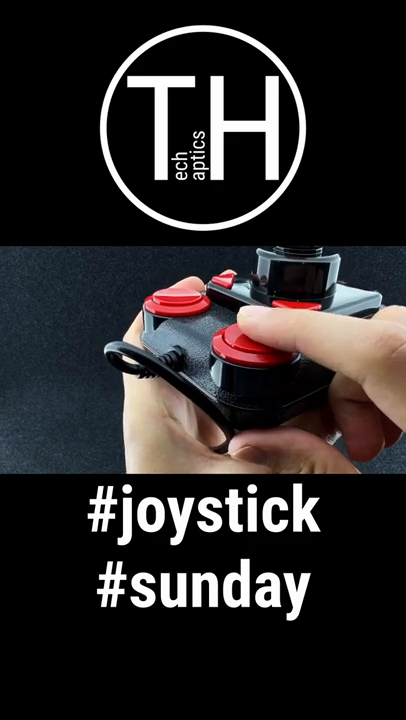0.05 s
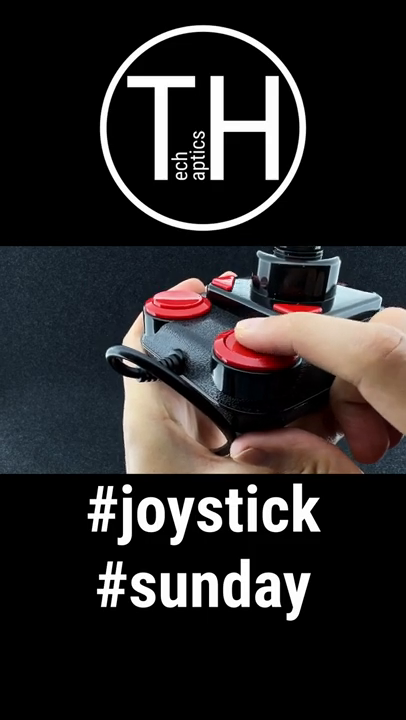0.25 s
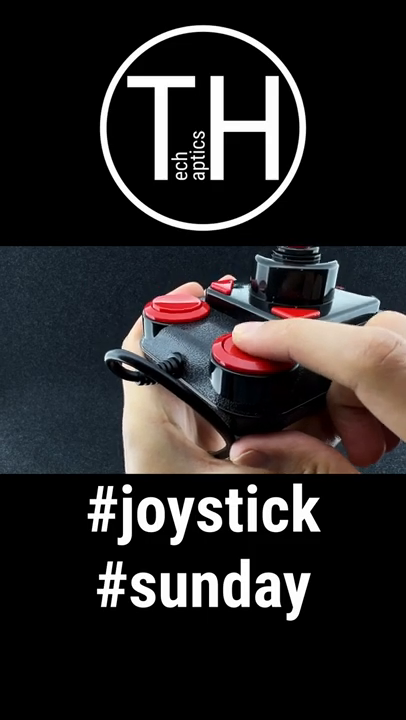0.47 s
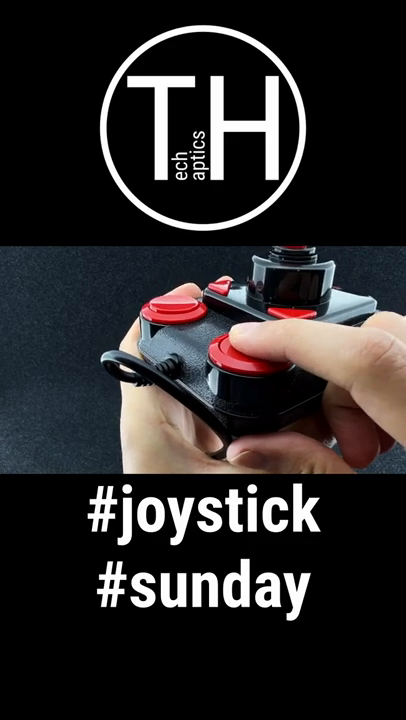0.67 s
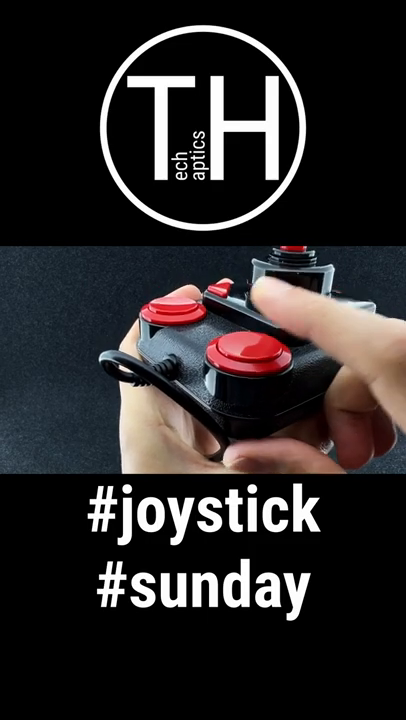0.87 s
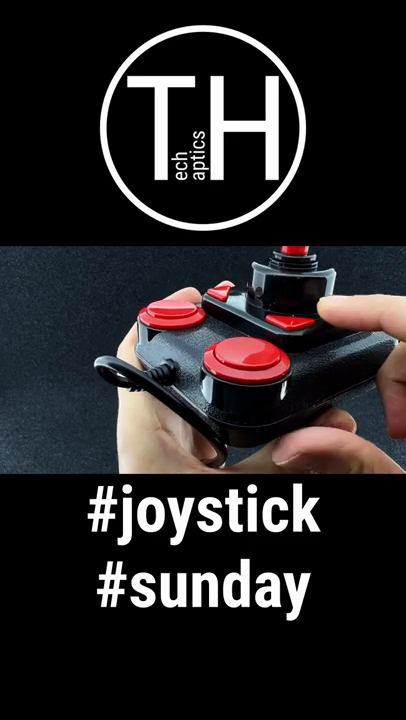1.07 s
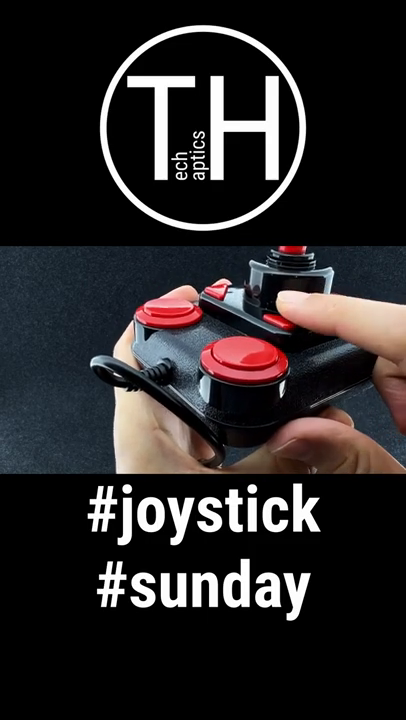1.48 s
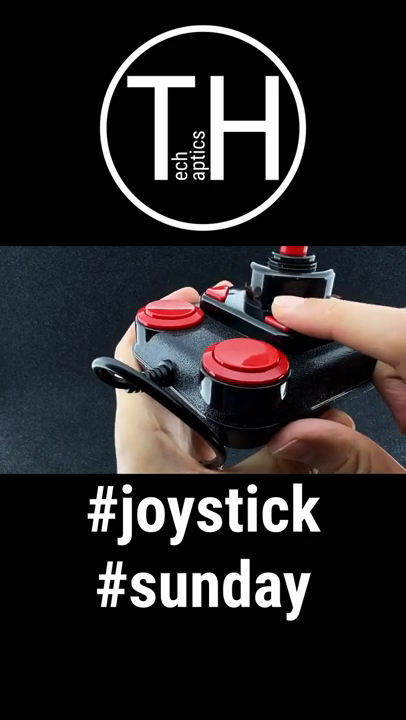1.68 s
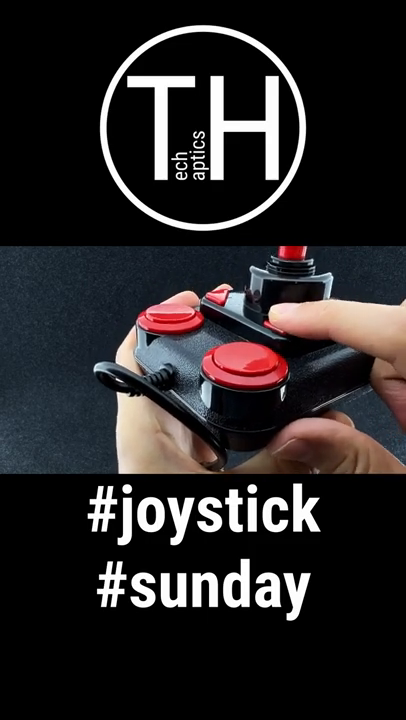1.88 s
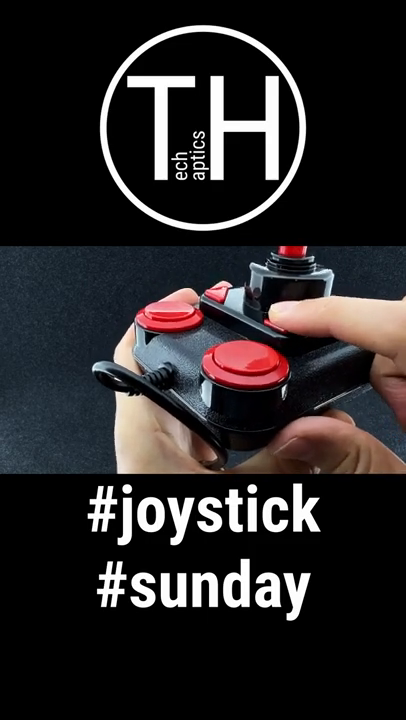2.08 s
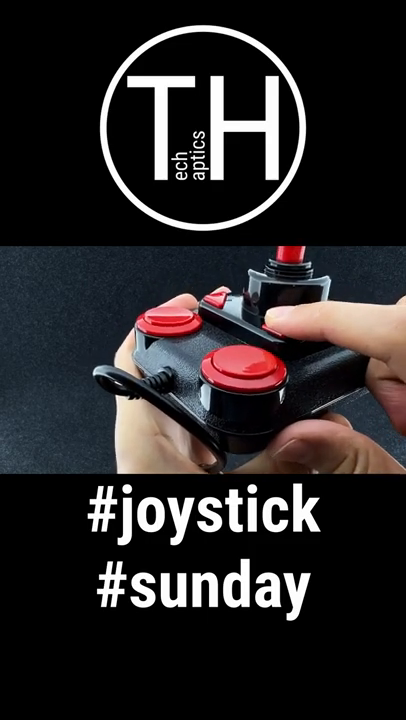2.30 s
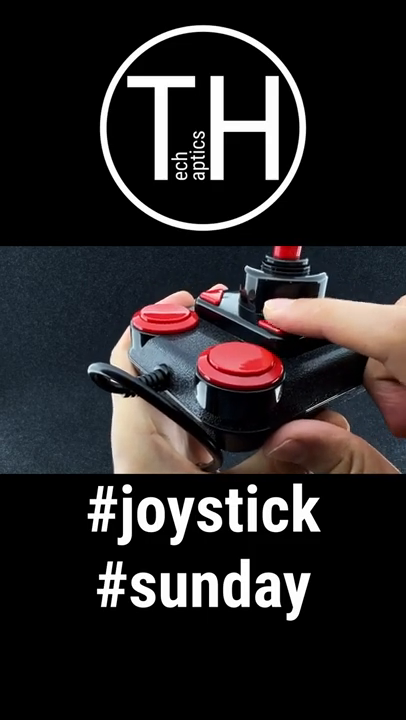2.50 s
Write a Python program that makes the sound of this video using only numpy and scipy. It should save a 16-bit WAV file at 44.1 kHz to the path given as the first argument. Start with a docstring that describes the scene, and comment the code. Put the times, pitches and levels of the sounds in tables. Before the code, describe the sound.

Joystick buttons click sharply under a thumb, in two quick groups with light handling ticks.

```python
"""A quiet room, a plastic joystick held close to a stereo microphone, slightly to the right.
A thumb works the round fire button three times, then a small button twice. Each press and release
snaps a switch: a crack, short modes of the hollow case, and a faint ring of springs and room.
Fingers tick and knock on the case; under them the holding hand rumbles and the room hisses."""
import sys
import numpy as np
from scipy import signal
from scipy.fft import rfft, irfft
from scipy.io import wavfile

SR = 44100
rng = np.random.default_rng(int(sys.argv[2]) if len(sys.argv) > 2 else 0)


def put_to_file(sound):
    """Save the sound as 16-bit audio at rate SR, in the file named by the first command-line argument."""
    columns = np.atleast_2d(sound).T  # one column per channel
    safe = np.clip(columns, -1, 1)
    whole_steps = np.round(safe * 32767)
    wavfile.write(sys.argv[1], SR, whole_steps.astype(np.int16))


N = 116865
T = np.arange(N) / SR

# Switch snaps: start_s, level_db, treble_db, bounce_delay_s, bounce_db (0 is twice the first strike)
ROUND_PRESSES = [(.2491, 2, -1.5, 0.00027, 17.5), (.4352, 0, -3.5, 0.0001, -13),
                 (.6272, -1.5, 2, .0003, -0.5)]
ROUND_RELEASES = [(.3812, 0, 0, .0006, -1), (.5523, 0, 0, 0.0005, -3), (.7793, 0, 0.0045, 0.00029, -5)]
SMALL_PRESSES = [(1.8703, 0.0046, 0.0022, .0004, -2.5), (2.0724, 0, 0, .0004, -28)]
SMALL_RELEASES = [(2.0210, -0.53, -0.87, .0004, 10), (2.3879, 0.49, -0.26, .0004, -14)]
# Case modes rung by each kind of snap, before the grip damps them: pitch_hz, level_db, t60_s
ROUND_PRESS_MODES = [(381, -33.5, 0.049), (593, -31.5, 0.017), (860, -26, 0.013), (1225, -20.5, .017),
                     (1613, -20, 0.022), (1982, -18.5, .016), (2188, -18, 0.0146), (3043, -30.5, .022),
                     (3740, -29, 0.034), (4600, -26, 0.025), (5273, -22, 0.012), (6640, -29, 0.018),
                     (8577, -33, .014), (11704, -22.5, .007)]
ROUND_RELEASE_MODES = [(439.8, -33.5, 0.0398), (893, -45, 0.05), (992, -36, 0.15), (1410, -11.5, 0.0031),
                       (2020, -38, 0.065), (2787, -49, 0.05), (3690, -31.5, 0.023), (4440, -23, 0.021),
                       (5690, -23.5, 0.033), (6273, -23, 0.014), (7220, -22, 0.013), (8053, -38, 0.065),
                       (9680, -12, 0.004), (12047, -24.5, 0.0084)]
SMALL_PRESS_MODES = [(428, -31.5, 0.025), (696, -22, 0.0094), (1052, -24.5, 0.035), (1538, -28.5, 0.018),
                     (1575, -31, 0.035), (2123, -31, 0.024), (3465, -29, 0.026), (3880, -31, 0.023),
                     (4830, -28, 0.022), (5490, -16, 0.005), (6710, -26.5, 0.018), (8380, -24.5, 0.0081),
                     (11400, -33, 0.0036)]
SMALL_RELEASE_MODES = [(475, -25, 0.02), (763, -23.5, 0.014), (1007, -24.5, 0.034), (1280, -20.5, 0.0024),
                       (1600, -32, 0.067), (2127, -34, 0.053), (3510, -31.5, .026), (4150, -23, 0.021),
                       (4550, -18.5, 0.011), (5560, -23, 0.019), (6020, -24.5, 0.013), (9160, -33, 0.021),
                       (12130, -32, 0.014)]
# Spectrum of each kind of crack: frequency_hz, gain_db
ROUND_PRESS_CRACK = [(200, -16.5), (1000, -1), (2500, 5), (4500, 6), (7500, -1), (11500, 2.5), (13500, -8),
                     (16000, -21.5)]
ROUND_RELEASE_CRACK = [(200, -6), (1000, 1.5), (2500, 8), (4500, 6.5), (7500, 2), (11500, 2), (13500, -7.5),
                       (16000, -12)]
SMALL_PRESS_CRACK = [(200, -5), (1000, -13), (2500, 6), (4500, -4), (7500, -14), (11500, 2), (13500, -0.5),
                     (16000, -14)]
SMALL_RELEASE_CRACK = [(200, -4.5), (1000, 4.5), (2500, -1.5), (4500, 3.5), (7500, 0.5), (11500, -11.5),
                       (13500, -14), (16000, 0.5)]
# Spectrum of the after-ring of springs and room: frequency_hz, gain_db
ROUND_PRESS_RING = [(120, -53), (200, -22.5), (289, -22.5), (353, 0), (432, -13.5), (491, -0.5), (635, -15),
                    (836, -13.5), (1270, -10), (1560, -3), (1840, -9.5), (4950, -16.5), (7140, -28),
                    (11300, -28), (16000, -55)]
ROUND_RELEASE_RING = [(120, -48), (200, -20.5), (482, 2.5), (671, -11.5), (1140, -7), (1270, -9),
                      (1450, -7.5), (1770, -13), (2090, -6.5), (2650, -17), (3490, -9.5), (5630, -9.5),
                      (7270, -14), (11100, -19.5), (16000, -33)]
SMALL_RING = [(120, -37), (200, -22), (509, 1), (696, -10), (836, -11.5), (1080, -6), (1420, -13),
              (2090, -9.5), (3020, -15), (5230, -10.5), (6050, -18), (12400, -29.5), (16000, -39)]
# Clear spring tones: pitch_hz, level_db, t60_s
ROUND_SPRING = [(488, -57, 1.3), (379.4, -61, .6), (1418, -59, .45), (1630, -60, 0.43), (2056, -59.5, 0.47)]
SMALL_SPRING = [(486, -59, .6), (380, -60, 0.76), (578, -65, 0.93), (690, -67, 1), (1060, -55.5, 0.28),
                (2090, -52, 0.16), (3870, -57, 0.26), (5600, -69, 0.56)]
# Finger ticks and button rattles: mid_rise_s, level_db, treble_db, half_rise_s, ping_hz
TICKS = [(0.226, -29, -12, 0.006, 1020), (0.2436, -15, -16, 0.00083, 1670),
         (0.351, -27, -22, 0.00089, 1510), (0.367, -17.5, -31, 0.0026, 950),
         (0.433, -15, -19, 0.0015, 1600), (.547, -24, 1, 0.0047, 754), (.5513, -7, -6, 0.00034, 1910),
         (0.624, -40, 19, .002, 1030), (0.766, -18, -17, 0.0025, 700), (0.844, -26, -24, 0.0012, 1886),
         (0.888, -32.5, -12, 0.0019, 957), (.952, -39.5, 0.5, 0.00092, 10980),
         (1.2871, -17, -3.5, 0.00034, 3550), (1.306, -36.5, -7, .001, 2107),
         (1.5422, -25, -11.5, 0.00029, 3380), (1.56, -29.5, -21, 0.0012, 1200),
         (1.650, -36.5, -24, 0.00043, 1907), (1.784, -36.5, -20, 0.00039, 1280),
         (2.2052, -26.5, -19, 0.000958, 3800), (2.225, -33.5, -3, 0.00041, 4300),
         (2.531, -31, -12, 0.0013, 1276), (2.5575, -20, -4, 0.0017, 1950), (2.603, -21, 10, 0.00043, 4810),
         (2.626, -24, -51, 0.0011, 2010)]
# Spectrum of a tick: frequency_hz, gain_db
TICK_COLOUR = [(200, -11.5), (420, -1), (1180, 0.5), (1500, -4.5), (2100, 0.5), (3700, -4), (6300, -3.5),
               (8200, -13), (11500, -15), (16000, -35)]
# Soft knocks of the thumb and the button travel: start_s, level_db, pitch_hz
KNOCKS = [(.347, -41.5, 453), (0.366, -35, 430), (0.381, -37, 89), (0.548, -27, 486), (0.765, -38, 336),
          (.777, -37, 111), (0.846, -43.5, 416), (0.885, -41.5, 95), (.890, -41.5, 430), (.952, -53.5, 200)]
# Spectrum of the room hiss: frequency_hz, gain_db
HISS_COLOUR = [(20, 22), (45, 22.5), (90, 7), (200, 4), (430, -1.5), (700, -5), (1200, -9), (2300, -13.5),
               (6000, -22), (14500, -24), (16500, -33.5)]

STRIKE_DB, GRIP_DAMPING_DB_PER_S = -24, 602.5
PARTNER_DETUNE, SPRING_DETUNE = 0.074, 0.006  # random spread, as a fraction of the pitch
PARTNER_DB, PING_DB = -3.5, -5.5  # relative to the mode and to the tick
HISS_DB, HAND_DB = -75.5, -47  # the hiss level counts only what lies above 300 Hz
BALANCE_DB, LEFT_LAG_S = 2, 8e-6  # the joystick is louder and earlier on the right


def switch_snaps(events, modes, spectrum, case_db, crack_db, size=4096):
    """Close to the microphone, a switch strikes, bounces once and chatters, ringing the case."""
    out = np.zeros((2, N))
    chatter = amp(10) * fade(0.00073) + fade(0.007) + amp(-17.5) * fade(0.025)  # impact, body, tail
    for start_s, level_db, treble_db, bounce_s, bounce_db in events:
        contact = unit(noise(side_db=-8, size=size) * chatter[:size])
        contact[:, 0] += amp(STRIKE_DB)
        contact[:, int(bounce_s * SR)] += 2 * amp(STRIKE_DB + bounce_db)
        crack = amp(crack_db) * colour(unit(contact), spectrum)
        case = amp(case_db) * case_ring(modes, size)
        add(out, start_s, amp(level_db) * treble(case + crack, treble_db))
    return out


def case_ring(modes, size):
    """Each case mode beats with a close partner that shifts with the grip; the hand damps them all."""
    t = T[:size]
    out = ring(modes, size)
    onset = 1 - np.exp(-t / 0.0016)
    for hz, db, t60 in modes:
        shift, phase = rng.standard_normal(2)
        partner = np.sin(2 * np.pi * hz * (1 + PARTNER_DETUNE * shift) * t + np.pi * phase)
        out += amp(db + PARTNER_DB - 60 * t / t60) * partner * onset
    return out * amp(-GRIP_DAMPING_DB_PER_S * t)


def after_ring(events, spectrum, tones, wash_db, low_t60, high_t60, hold_s):
    """Springs and room ring on: a wash that holds, then dies, and tones that shift with the tension."""
    out = np.zeros((2, N))
    crossover = signal.butter(2, 6500, fs=SR)
    for start_s, level_db, *_ in events:
        detuned = [(hz * (1 + SPRING_DETUNE * rng.standard_normal()), db, t60) for hz, db, t60 in tones]
        wash = noise(side_db=-4)
        low = signal.lfilter(*crossover, wash)
        dying = low * fade(low_t60, hold_s) + (wash - low) * fade(high_t60, hold_s)
        shimmer = amp(wash_db) * unit(colour(dying, spectrum))
        add(out, start_s, amp(level_db) * (shimmer + ring(detuned)))
    return out


def finger_ticks(size=16384):
    """Skin and loose buttons scuff the case in brief bursts; each spot has its own ping."""
    out = np.zeros((2, N))
    t = T[:size]
    for mid_rise_s, level_db, treble_db, half_rise_s, ping_hz in TICKS:
        peak_s = 2 * half_rise_s
        rise = np.exp(np.minimum(t - peak_s, 0) / half_rise_s) * t / peak_s
        fall = fade(0.02, hold_s=peak_s) + amp(-21.5) * fade(0.12)
        burst = unit(noise(side_db=-9, size=size) * np.where(t < peak_s, rise, fall[:size]))
        ping = unit(signal.lfilter(*signal.iirpeak(ping_hz, Q=8.1, fs=SR), burst))
        scuff = treble(unit(colour(burst, TICK_COLOUR)), treble_db)
        add(out, mid_rise_s - half_rise_s, amp(level_db) * (scuff + amp(PING_DB) * ping))
    return out


def thumb_knocks(t60=0.022):
    """Soft pushes ring only the low end of the case."""
    out = np.zeros((2, N))
    onset = 1 - fade(0.004)
    for start_s, level_db, pitch_hz in KNOCKS:
        add(out, start_s, ring([(pitch_hz, level_db, t60)]) * onset)
    return out


def hand_rumble():
    """The holding hand rumbles slowly, below the range of pitch."""
    band = signal.butter(3, (4, 15), "band", fs=SR, output="sos")
    rumble = signal.sosfilt(band, rng.standard_normal((2, N)) + 0.2 * rng.standard_normal(N))
    return amp(HAND_DB) * rumble / rumble.std()


def room_hiss():
    """Steady, bass-heavy room tone, much the same on both sides of the microphone."""
    hiss = colour(rng.standard_normal((2, N)) + 2.1 * rng.standard_normal(N), HISS_COLOUR)
    above_bass = signal.sosfilt(signal.butter(4, 300, "high", fs=SR, output="sos"), hiss)
    return amp(HISS_DB) * hiss / above_bass.std()


def amp(db):
    """Decibels to gain."""
    return 10 ** (np.asarray(db) / 20)


def fade(t60, hold_s=0):
    """Hold at 1, then fall 60 dB every t60 seconds."""
    return np.exp(-np.clip(np.log(1000) * (T - hold_s) / t60, 0, 100))


def unit(x):
    """Scale to a mean energy of 1 a channel."""
    return x / np.sqrt(np.mean(np.sum(x ** 2, axis=-1)))


def colour(x, points, size=2048):
    """Minimum-phase filter through (Hz, dB) points, rolling off below the first."""
    hz, db = np.array(points, float).T
    bin_hz = np.maximum(np.arange(size // 2 + 1) * SR / size, 10)
    gain = amp(np.interp(np.log(bin_hz), np.log(hz), db)) * np.minimum(bin_hz / hz[0], 1)
    cepstrum = irfft(np.log(gain))
    cepstrum[1:size // 2] *= 2
    cepstrum[size // 2 + 1:] = 0
    impulse = irfft(np.exp(rfft(cepstrum)))
    return signal.oaconvolve(x, impulse[None], axes=-1)[:, :x.shape[1]]


def treble(x, db, corner_hz=2570):
    """Lift or lower the treble."""
    return x + (amp(db) - 1) * signal.lfilter(*signal.butter(1, corner_hz, "high", fs=SR), x)


def noise(side_db, size=N):
    """Stereo noise, wider in the treble."""
    mid, side = rng.standard_normal((2, size))
    side = amp(side_db) * treble(side / 10, 23.9)
    return np.array([mid + side, mid - side])


def ring(modes, size=N):
    """Decaying modes of alternating sign."""
    t = T[:size]
    return sum((-1) ** k * amp(db - 60 * t / t60) * np.sin(2 * np.pi * hz * t)
               for k, (hz, db, t60) in enumerate(modes))


def add(out, start_s, x):
    """Mix x in from start_s."""
    first = int(start_s * SR)
    length = min(x.shape[-1], N - first)
    out[:, first:first + length] += x[..., :length]


def scene():
    """Both buttons and the handling, close up and a little to the right, over the room tone."""
    stick = switch_snaps(ROUND_PRESSES, ROUND_PRESS_MODES, ROUND_PRESS_CRACK, case_db=2.5, crack_db=1.5)
    stick += switch_snaps(ROUND_RELEASES, ROUND_RELEASE_MODES, ROUND_RELEASE_CRACK,
                          case_db=0, crack_db=1)
    stick += switch_snaps(SMALL_PRESSES, SMALL_PRESS_MODES, SMALL_PRESS_CRACK, case_db=3, crack_db=-3)
    stick += switch_snaps(SMALL_RELEASES, SMALL_RELEASE_MODES, SMALL_RELEASE_CRACK,
                          case_db=1.5, crack_db=-1)
    stick += after_ring(ROUND_PRESSES, ROUND_PRESS_RING, ROUND_SPRING,
                        wash_db=-16.5, low_t60=0.14, high_t60=0.4, hold_s=0.075)
    stick += after_ring(ROUND_RELEASES, ROUND_RELEASE_RING, ROUND_SPRING,
                        wash_db=-17, low_t60=0.52, high_t60=0.42, hold_s=0.053)
    stick += after_ring(SMALL_PRESSES + SMALL_RELEASES, SMALL_RING, SMALL_SPRING,
                        wash_db=-17.5, low_t60=0.38, high_t60=0.33, hold_s=0.01)
    stick += finger_ticks() + thumb_knocks()
    lag = np.exp(-2j * np.pi * np.fft.rfftfreq(2 * N, 1 / SR) * LEFT_LAG_S)
    left = irfft(rfft(stick[0], 2 * N) * lag)[:N] * amp(-BALANCE_DB / 2)
    right = stick[1] * amp(BALANCE_DB / 2)
    return np.array([left, right]) + room_hiss() + hand_rumble()


def record(dry):
    """The recorder cuts the top steeply above 16.7 kHz."""
    return signal.sosfilt(signal.ellip(8, 0.2, 70, 16700, fs=SR, output="sos"), dry)


dry = scene()
out = record(dry)
put_to_file(out)
```